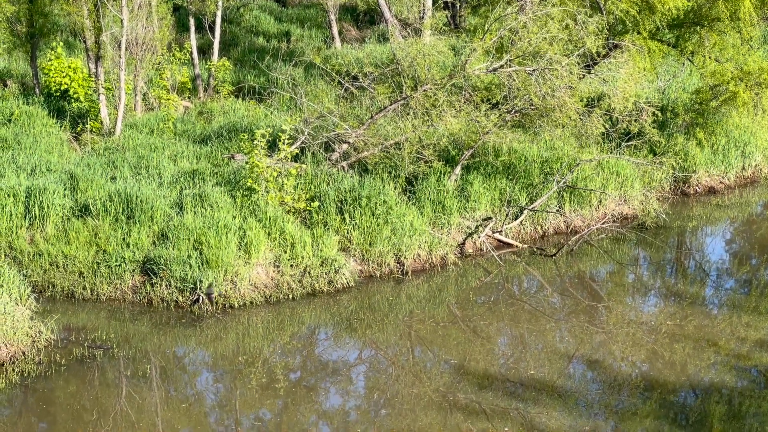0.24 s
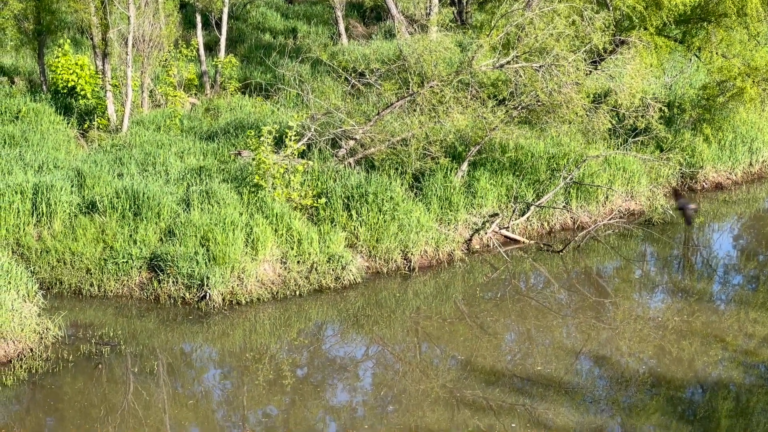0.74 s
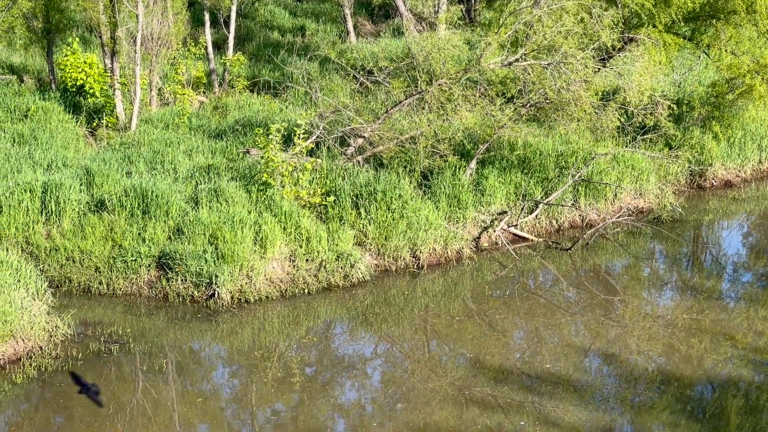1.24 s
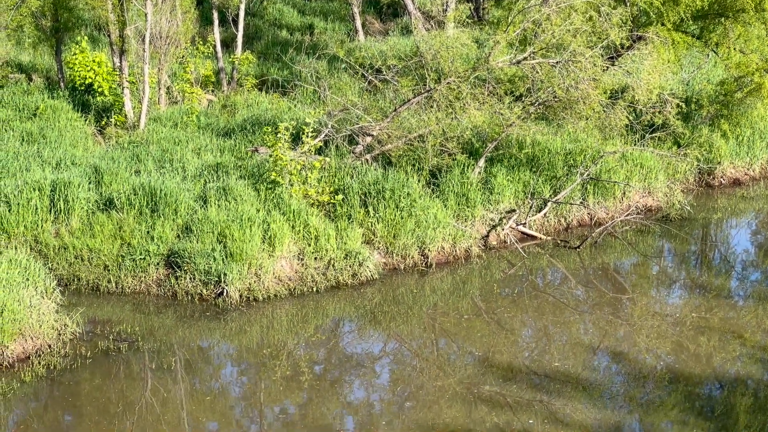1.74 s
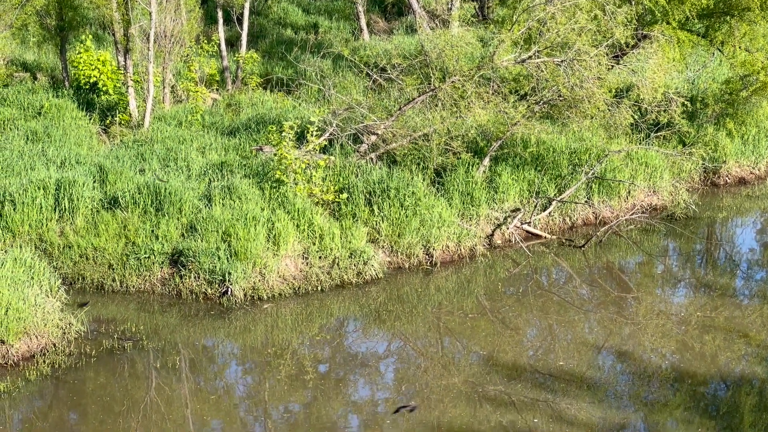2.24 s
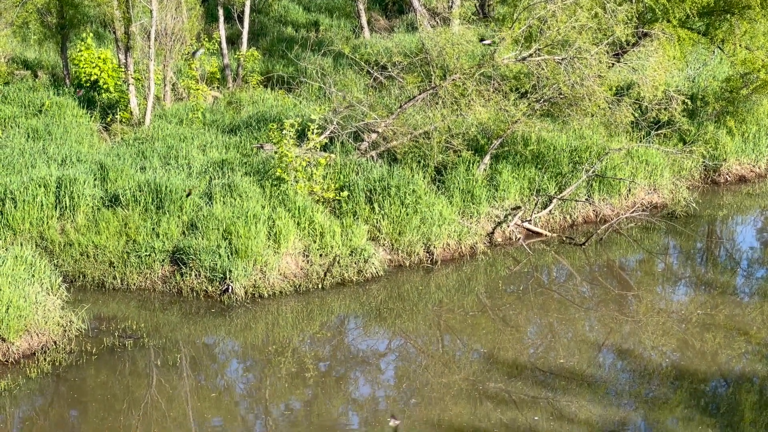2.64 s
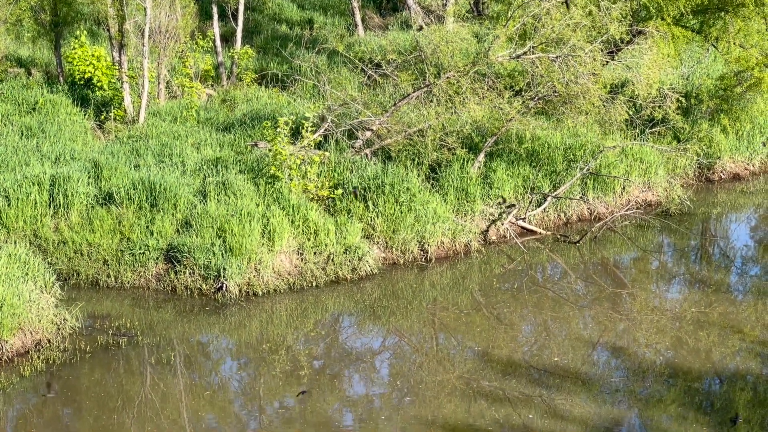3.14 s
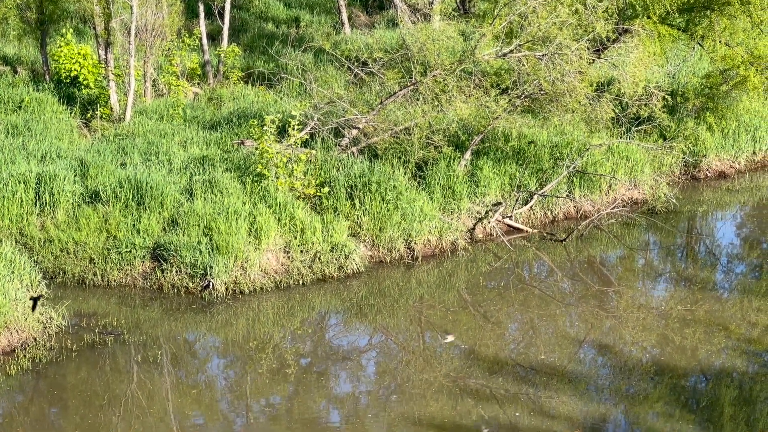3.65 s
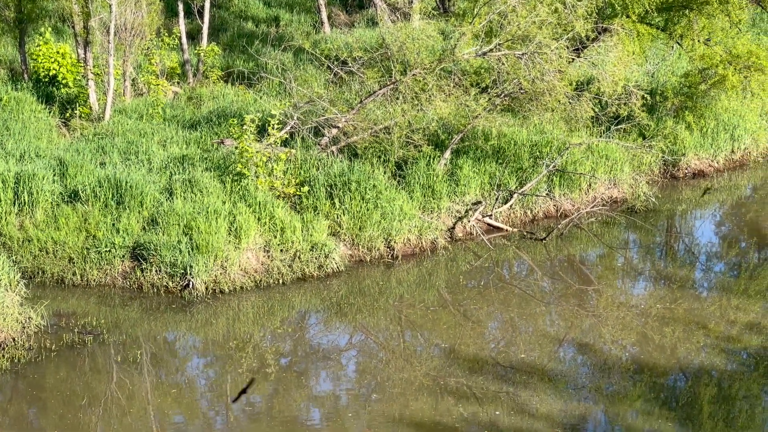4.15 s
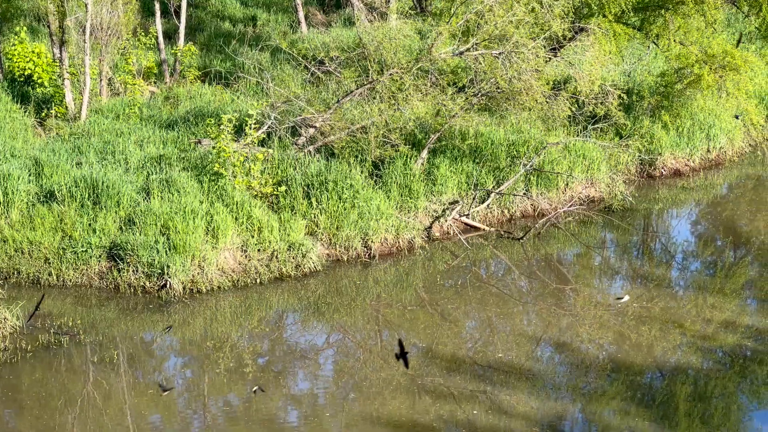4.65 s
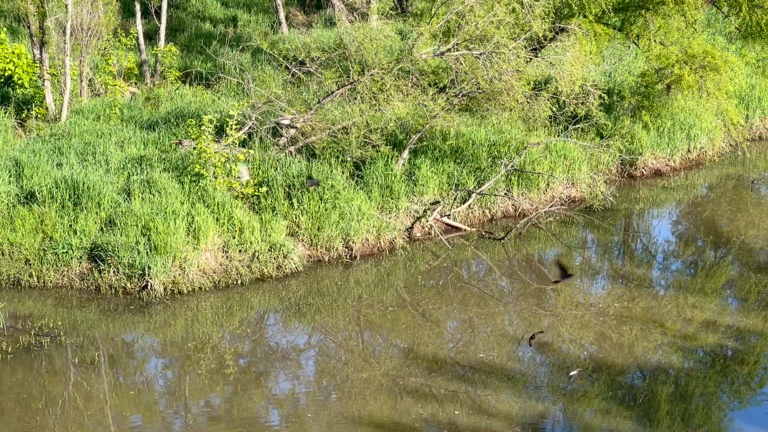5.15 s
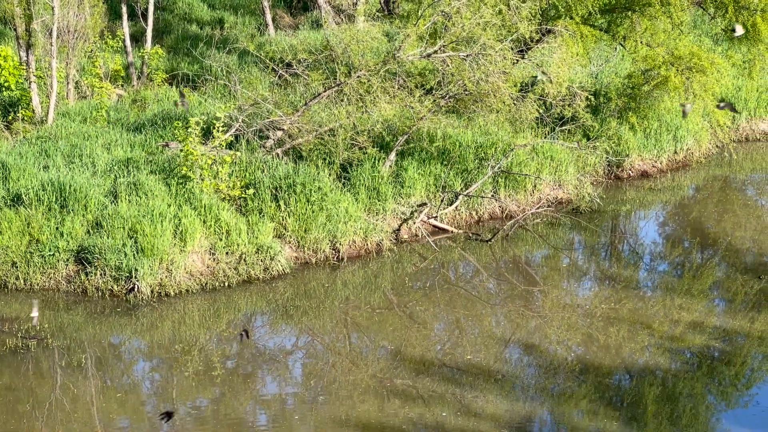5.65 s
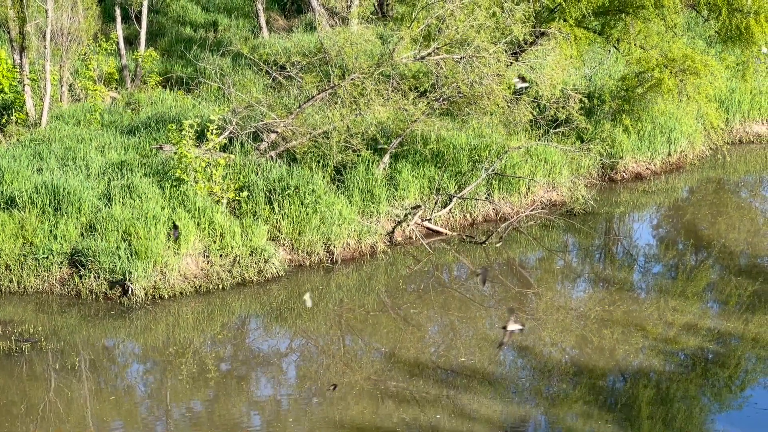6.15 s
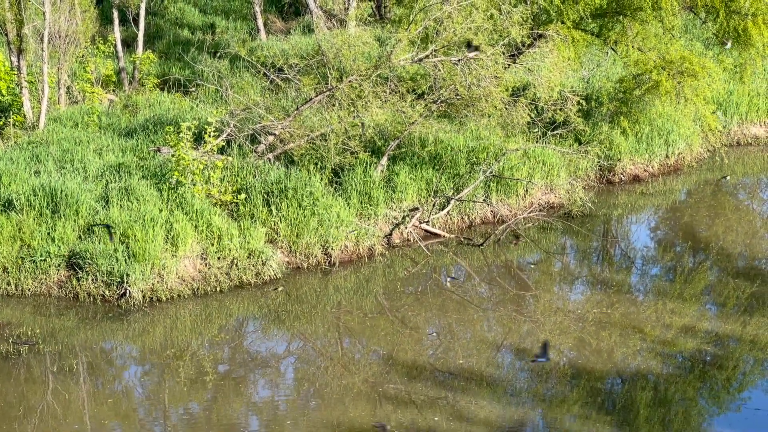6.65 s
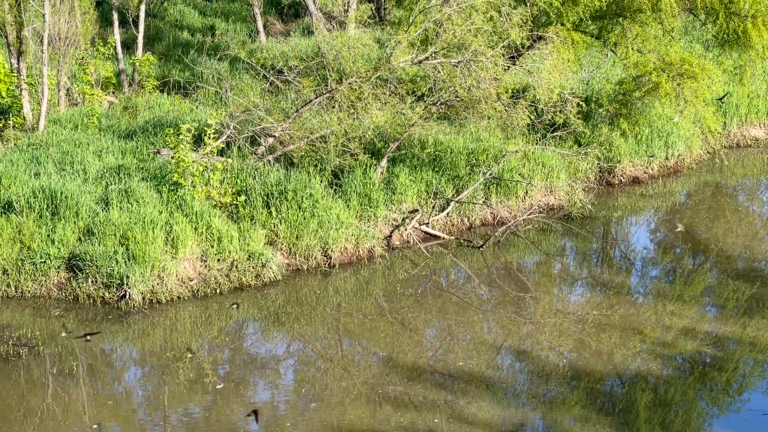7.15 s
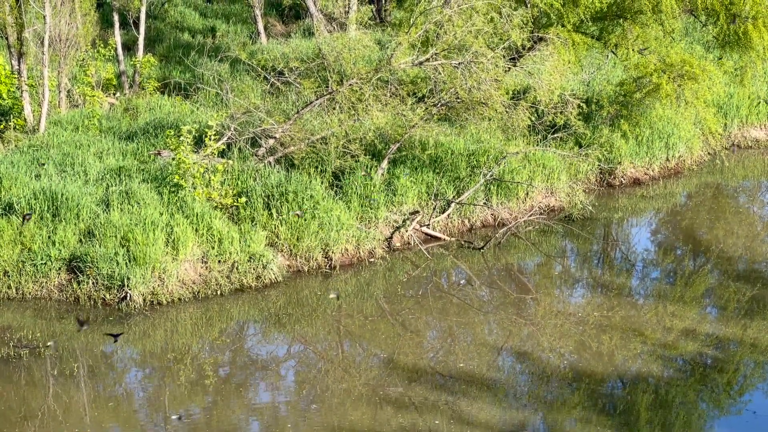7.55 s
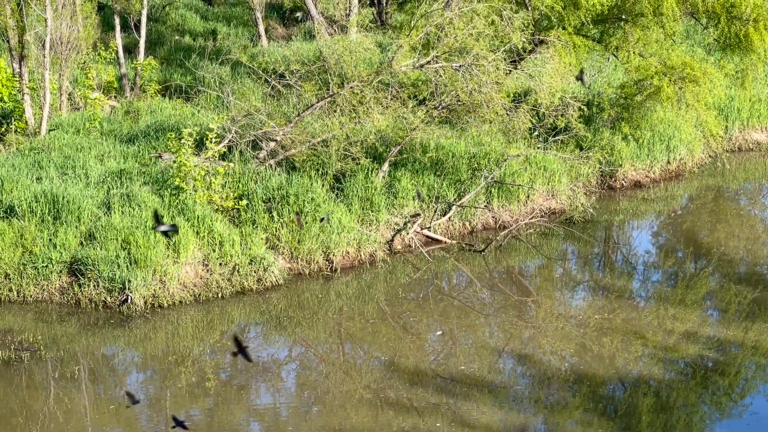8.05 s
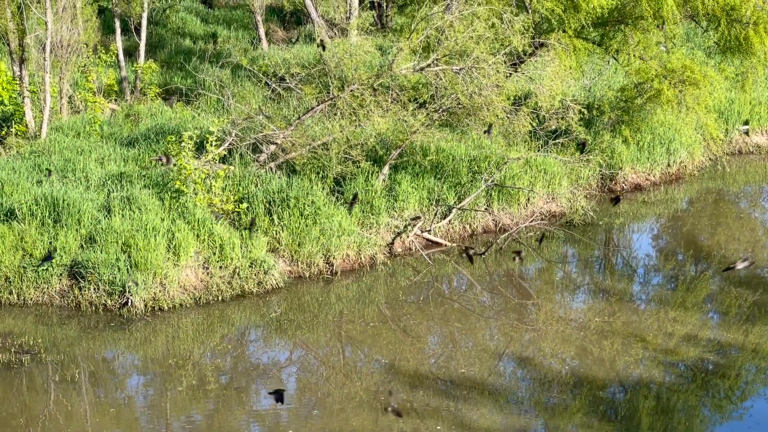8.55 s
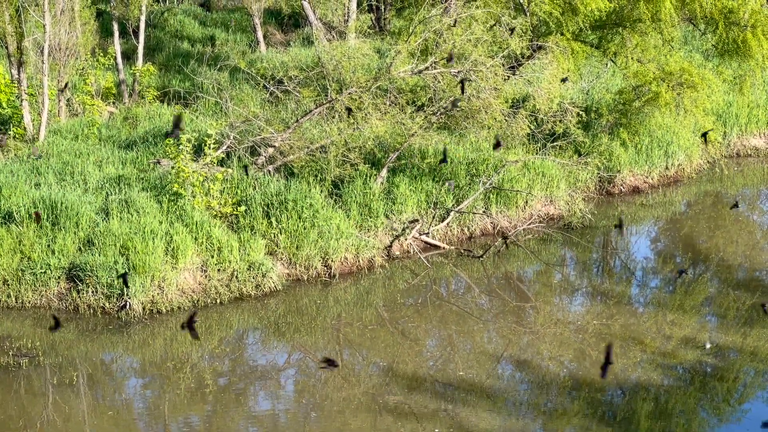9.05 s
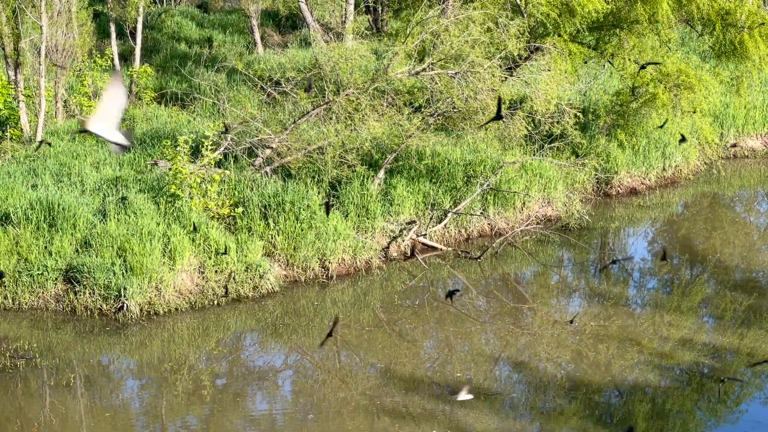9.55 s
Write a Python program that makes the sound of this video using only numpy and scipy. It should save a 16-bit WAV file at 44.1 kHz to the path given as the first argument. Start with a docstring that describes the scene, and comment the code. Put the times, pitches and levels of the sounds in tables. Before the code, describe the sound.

Quiet creekside birdsong: thin whistles and chips, a brisk high repeated phrase, then ever denser, louder falling swallow chirps over a growing low rush.

```python
"""Swallows over a creek

A flock of swallows calls over a creek, nearer and denser with time, while a warbler repeats its phrase in the trees.
Swallow calls are two gliding voices that modulate each other; the warbler, whistles and chips are single gliding sines.
Far chips twitter behind them and a wooden knock falls once; trunks and banks scatter the birds as decaying taps.
A low rush, shaped noise, grows near the end over the quiet air of the wood."""
import sys
import numpy as np
from scipy import signal
from scipy.fft import rfft, irfft, next_fast_len
from scipy.io import wavfile
from scipy.ndimage import uniform_filter1d

SR = 44100
rng = np.random.default_rng(int(sys.argv[2]) if len(sys.argv) > 2 else 0)


def to_wav(s):
    """Save 16-bit WAV."""
    ch = np.atleast_2d(s).T  # columns
    pcm = np.round(np.clip(ch, -1, 1) * 32767)  # PCM
    wavfile.write(sys.argv[1], SR, pcm.astype(np.int16))


N = 432180


def gain_of(db):
    """Decibels to amplitude gain."""
    return 10 ** (np.asarray(db) / 20)


def evened(x):
    """Scales to rms 1."""
    return x / np.sqrt(np.mean(x ** 2) + 1e-20)


def read(points, hz):
    """Reads a curve over frequency, interpolating on a log axis."""
    f, value = np.transpose(points)
    return np.interp(np.log(hz + 1), np.log(f + 1), value)


def waver(length, size):
    """Smooth random drift of rms 1; a larger size drifts more slowly."""
    once = uniform_filter1d(rng.standard_normal(length), size)
    return evened(uniform_filter1d(once, size))


def sine(hz):
    """Sine that follows a pitch track."""
    return np.sin(2 * np.pi * np.cumsum(hz) / SR)


def add(mix, s, sound, lag):
    """Mixes a sound in; the right channel hears it lag samples later."""
    for channel, at in enumerate((round(s * SR), round(s * SR + lag))):
        part = mix[channel, max(at, 0):][:len(sound)]
        part += sound[:len(part)]


def rasp(length, depth):
    """Turbulent air shakes the loudness quickly and spreads a noisy skirt round each line."""
    return 1 + depth * waver(length, size=36)


def flock():
    """Each call has its own lag between the channels; the water mirrors it after a short random delay."""
    # swallow calls: t/s, length/s, kind, upper voice start f/Hz, lower voice start f/Hz, sum tone end f/Hz,
    # call level/dB before its partials are weighted, upper voice added level/dB; the row at 5.947 s is the
    # water's duller mirror of the call at 5.95 s
    swallow_calls = [(3.104, 0.12, "wide", 2320, 1550, 2730, -57.5, -6.5),
                     (3.998, 0.18, "dull", 2377, 1732, 2466, -59, 0.5),
                     (4.513, 0.14, "close", 2250, 1970, 2510, -64.5, -6),
                     (4.697, 0.093, "shrill", 1934, 1725, 3000, -64.5, -12),
                     (5.064, 0.17, "long", 2250, 1976, 2560, -63.5, -7.5),
                     (5.267, .12, "close", 2270, 1977, 2990, -49.5, -5.5),
                     (5.489, 0.12, "shrill", 2064, 1350, 2415, -68, 5),
                     (5.634, .1, "wide", 2500, 1680, 2750, -58, 6.5),
                     (5.659, 0.16, "shrill", 2305, 1646, 2604, -65.5, -4),
                     (5.947, 0.13, "dull", 2690, 1837, 2850, -53.5, -12),
                     (5.95, 0.12, "high", 2708, 1860, 3370, -52, -6.5),
                     (6.059, 0.13, "close", 2162, 1950, 2690, -52, -9),
                     (6.209, 0.1, "low", 2073, 1550, 2830, -62.5, 2),
                     (6.273, 0.16, "long", 2320, 2156, 2654, -55, -9),
                     (6.523, 0.077, "dull", 1843, 1750, 2890, -57.5, -26),
                     (6.626, 0.13, "high", 2607, 1925, 3094, -49, -8),
                     (6.664, 0.084, "dull", 2606, 1708, 2790, -57.5, 0),
                     (6.889, 0.097, "wide", 2056, 1357, 2780, -66.5, 5.5),
                     (6.909, 0.15, "low", 2287, 1825, 2780, -55, -5.5),
                     (6.953, 0.13, "shrill", 2228, 1330, 2440, -65.5, 5.5),
                     (7.111, 0.096, "arched", 2430, 1566, 2770, -65, 14.5),
                     (7.157, 0.12, "high", 2636, 1935, 2960, -46, -5),
                     (8.348, 0.031, "shrill", 1990, 1495, 2840, -56, -24),
                     (7.243, 0.17, "dull", 2557, 1770, 3100, -58.5, -7.5),
                     (7.266, 0.16, "low", 1985, 1625, 2450, -63, -8),
                     (7.393, .13, "close", 2214, 1846, 2960, -54.5, -2),
                     (7.475, 0.072, "close", 2273, 2086, 3510, -52.5, -7),
                     (7.514, 0.11, "arched", 2203, 1646, 2450, -58, 2.5),
                     (7.604, .12, "high", 2606, 1932, 3180, -44.5, -7),
                     (7.668, 0.074, "wide", 2763, 1900, 2500, -56.5, -9),
                     (7.816, 0.084, "low", 2540, 1530, 2740, -70, 20),
                     (7.922, .13, "close", 2070, 1544, 2225, -52.5, -0.5),
                     (8.027, 0.17, "long", 2280, 2080, 2610, -55.5, 0.5),
                     (8.285, 0.097, "arched", 2415, 1482, 2464, -76.5, 30),
                     (8.4, 0.14, "high", 2640, 1993, 2680, -42.5, -5),
                     (8.577, 0.084, "high", 2347, 1662, 3170, -57.5, -3),
                     (8.601, 0.16, "long", 2210, 1915, 2410, -59, -0.5),
                     (8.683, 0.12, "dull", 2085, 1603, 2480, -60, 0),
                     (8.857, 0.091, "dull", 2500, 1520, 2670, -57.5, 9.5),
                     (8.919, 0.099, "wide", 2417, 1510, 2574, -51, 4),
                     (8.985, .13, "high", 2586, 2000, 2875, -40, -4.5),
                     (9.04, 0.13, "long", 2335, 1565, 2400, -55.5, -1),
                     (9.159, .13, "close", 2524, 1580, 2380, -71, 9),
                     (9.446, 0.098, "dull", 1977, 1794, 2640, -46, -9),
                     (9.486, .13, "high", 2552, 1850, 2954, -38.5, -5),
                     (9.635, 0.11, "close", 2223, 1490, 2720, -49, -11),
                     (9.701, 0.096, "low", 2507, 1547, 2800, -55.5, 6)]
    # kinds of call: bend [power of the fall], easing [0-1, as the fall levels off],
    # brightness level/dB, share of the fall taken by the upper voice [0-1]
    call_kinds = {"high": (1.74, 0.8, -5.5, 0.26), "close": (2.5, 0.46, -4.5, 0.31),
                  "arched": (2, 0.14, 20.2, 0.46), "dull": (1.44, 0, -5, 0.4), "wide": (1, 0.47, 12.7, .43),
                  "low": (1.5, .3, 6.9, 0.48), "shrill": (1.05, 0.476, 20.9, 0.43),
                  "long": (.9, 0.735, 11.4, 0.26)}
    out = np.zeros((2, N))
    for s, length, kind, upper_hz, lower_hz, end_hz, db, upper_db in swallow_calls:
        bend, ease, bright_db, share = call_kinds[kind]
        fall_hz = upper_hz + lower_hz - end_hz
        upper_end_hz = upper_hz - share * fall_hz
        lower_end_hz = lower_hz - (1 - share) * fall_hz
        sound = swallow(length, upper_hz, upper_end_hz, lower_hz, lower_end_hz,
                        bend, ease, db, upper_db, bright_db)
        lag = rng.normal(.7, .45)  # samples
        start_s = s - .012  # room for the scoop
        add(out, start_s, sound, lag)
        add(out, start_s + rng.uniform(.008, 0.022), gain_of(-11.0) * sound, lag)
    return out


def swallow(length, up0, up1, low0, low1, bend, ease, db, upper_db, bright_db):
    """Both halves of the syrinx fall together and modulate each other, so sums of their multiples sound."""
    # partials: multiple of upper voice, multiple of lower voice, level/dB
    partial_mix = [(1, 0, -5.5), (2, 0, 1), (3, 0, -25.5), (4, 0, -16), (5, 0, -13.5), (6, 0, -28),
                   (1, 1, 3.5), (2, 1, -11.5), (3, 1, -20), (2, 2, -13), (3, 2, -11), (3, 3, -18.5),
                   (4, 2, -28), (4, 1, -23.5), (5, 1, -16.5)]
    t = np.arange(round((length + 0.014) * SR)) / SR - .012
    scoop = 1 - .1 * np.clip(-t / 0.01196, 0, 1) ** 2  # pitch slides up as pressure builds
    fall = np.clip(t / length, 0, 1) ** bend
    fall = fall + np.clip(ease, 0, 1) * (np.sin(np.pi / 2 * fall) ** 2 - fall)

    # fainter birds are farther: air takes their high partials
    far_db = 0.67 * min(db + max(upper_db, 0) + 31.5, 0)
    flutter = 0.0024 * gain_of(-.8 * (far_db + 9.0))  # moving air blurs their pitch
    grain = 0.17 * gain_of(-.5 * (far_db + 9.5))  # and breaks the partials into beads, the high ones most

    def voice_phase(start_hz, end_hz):
        """Phase of one half of the syrinx along its fluttering fall."""
        hz = (start_hz + (end_hz - start_hz) * fall) * scoop
        return 2 * np.pi * np.cumsum(hz * (1 + flutter * waver(len(t), size=60))) / SR

    upper, lower = voice_phase(up0, up1), voice_phase(low0, low1)
    colour_db = 0.88 * rng.standard_normal(len(partial_mix))  # each call favours other partials
    tone = np.zeros(len(t))
    for (m, n, partial_db), own_db in zip(partial_mix, colour_db):
        level_db = partial_db + far_db * max(m + n - 3, 0)
        if m + n > 2:
            level_db += own_db + bright_db
        if n == 0:
            level_db += upper_db
        shimmer_db = 3.0 * (.25 if m == n else 1)  # equal multiples shimmer least
        level_db = level_db + shimmer_db * waver(len(t), size=220)
        beads = 1 + grain * (m + n) / 2 * waver(len(t), size=70)
        tone += gain_of(level_db) * np.sin(m * upper + n * lower) * beads

    hiss = np.diff(rng.standard_normal(len(t) + 1))  # air rushing through the beak, faint from afar
    tone = tone + gain_of(-26.0 + max(upper_db, 0) + 2.7 * far_db) * hiss
    swell = np.abs(np.sin(np.pi * np.linspace(0, 1, len(t)) ** 0.91)) ** 0.91
    return gain_of(db) * swell * tone * rasp(len(t), 0.082)


def warbler():
    """An arched and a rising whistle in turn, each a sine following its pitch and level curve."""
    # phrases: arched note t/s, rising note t/s, phrase level/dB
    phrases = [(2.389, 2.44, -58), (2.611, 2.662, -49), (2.8336, 2.886, -44.5), (3.062, 3.114, -44.5),
               (3.2953, 3.3482, -43.5), (3.524, 3.577, -44), (3.7555, 3.807, -45)]
    # arched note: t/s from onset, f/Hz, relative level/dB
    arched_note = [(-.008, 2855, -22), (.003, 4150, -9.5), (.011, 4530, -7), (.019, 4704, -4.5),
                   (.03, 4350, -6.5), (.043, 3700, -17.5), (.05, 3800, -24.5)]
    # rising note: t/s from onset, f/Hz, relative level/dB
    rising_note = [(-.005, 6050, -9), (.004, 4980, 0), (.012, 5114, 1), (.043, 5820, 1), (.058, 7490, 5.5),
                   (.068, 7990, 1.5), (.074, 8000, 1.5), (.083, 8570, -8), (.09, 8500, -45)]
    arch_boost_db = 5
    out = np.zeros((2, N))
    arch_s, rise_s, phrase_db = np.transpose(phrases)
    for shape, onsets, levels_db in ((arched_note, arch_s, phrase_db + arch_boost_db),
                                     (rising_note, rise_s, phrase_db)):
        s, hz, db = np.transpose(shape)
        t = np.arange(s[0], s[-1], 1 / SR)
        pitch = uniform_filter1d(np.interp(t, s, hz), 250, mode="nearest")
        for at, note_db in zip(onsets, levels_db):
            sung = pitch * (1 + 0.008 * waver(len(t), size=500))  # no two notes are quite alike
            level_db = np.interp(t, s, db) + 1.5 * waver(len(t), size=300)
            note = gain_of(level_db) * sine(sung) * signal.windows.tukey(len(t), .15)
            add(out, at + s[0], gain_of(note_db) * note, 1)
    return out


def whistles():
    """Near-pure gliding whistles and chips, on a curved glide; the low ones throb."""
    # whistles and chips: t/s, length/s, start f/Hz, middle f/Hz, end f/Hz, level/dB
    whistle_notes = [(0.019, 0.054, 2690, 2700, 2860, -63.5), (0.066, 0.092, 2820, 3133, 2920, -59),
                     (0.272, 0.046, 5720, 5150, 4930, -64), (0.292, 0.085, 2770, 2690, 2637, -57.5),
                     (0.369, 0.078, 2980, 2868, 2820, -54), (0.362, 0.029, 3400, 3180, 2940, -67),
                     (0.395, 0.03, 6100, 5800, 5450, -63), (0.6, 0.105, 4160, 3590, 2820, -56),
                     (0.605, 0.028, 3030, 2990, 2890, -60), (0.844, 0.059, 4650, 3840, 3370, -62.5),
                     (0.866, 0.05, 2640, 2574, 2530, -51), (0.918, 0.067, 2580, 2645, 2690, -53),
                     (0.983, 0.058, 2700, 2700, 2750, -62), (0.882, 0.057, 5460, 5200, 4280, -69),
                     (0.915, 0.05, 5650, 5400, 5440, -74), (1.45, 0.033, 4410, 4450, 4500, -70),
                     (1.319, 0.052, 2130, 2200, 2370, -73.5), (1.76, 0.015, 3800, 3450, 3270, -61),
                     (1.828, 0.044, 7200, 5850, 4720, -69), (1.838, 0.07, 4980, 4510, 4620, -60),
                     (1.51, 0.048, 6500, 6160, 6040, -75), (1.655, 0.04, 7700, 6640, 5630, -74),
                     (1.969, 0.066, 4080, 4920, 6440, -62), (2.025, 0.044, 5920, 5340, 3100, -65),
                     (2.123, 0.088, 3450, 3516, 3620, -61), (2.235, 0.059, 5050, 5930, 8170, -63.5),
                     (2.33, 0.061, 2615, 2600, 2550, -71.5), (2.469, 0.0088, 3700, 3410, 3400, -59),
                     (2.643, 0.16, 2790, 2265, 2385, -73.5), (2.763, 0.0079, 3340, 3510, 3640, -56),
                     (2.923, 0.18, 3640, 2324, 2300, -71), (3.421, 0.083, 2335, 2730, 3130, -73),
                     (3.002, 0.009, 3540, 3380, 3480, -58), (3.57, 0.027, 2330, 2430, 2590, -58),
                     (3.583, 0.079, 2980, 3140, 2870, -59), (3.483, 0.05, 3350, 4150, 5050, -63),
                     (3.688, 0.0068, 3500, 3530, 3400, -62), (3.748, 0.088, 2950, 2846, 2860, -62),
                     (3.702, 0.095, 4900, 3820, 3130, -59.5), (3.893, 0.048, 3300, 4450, 3800, -59.5),
                     (3.955, 0.086, 7220, 6160, 6020, -70), (3.965, 0.052, 3190, 4480, 4700, -58.5),
                     (4.057, 0.11, 5780, 4690, 3290, -59), (4.106, 0.049, 5200, 5400, 7970, -68.5),
                     (4.206, 0.068, 2270, 2216, 2440, -66), (4.259, 0.091, 4930, 5220, 7570, -75),
                     (4.296, 0.037, 3200, 3900, 4740, -60.5), (4.361, 0.036, 3340, 4300, 4600, -64),
                     (4.403, 0.16, 2194, 2243, 1930, -68.5), (4.479, 0.11, 4920, 6320, 6400, -74),
                     (4.595, 0.045, 5500, 5120, 4600, -61), (4.71, 0.08, 7540, 6700, 4880, -67.5),
                     (4.795, 0.069, 3250, 3300, 3370, -71.5), (4.943, 0.012, 3200, 3440, 3580, -63.5),
                     (6.163, 0.032, 6900, 5800, 4750, -57), (6.353, 0.1, 6250, 5250, 4540, -61.5),
                     (6.479, 0.046, 3530, 4380, 4280, -59.5), (7.337, 0.02, 7500, 7140, 6130, -58),
                     (7.477, 0.046, 9030, 6500, 4200, -57), (7.875, 0.046, 5160, 5820, 5800, -55.5),
                     (8.161, 0.048, 6700, 6320, 5500, -61.5), (7.3, 0.031, 4700, 5120, 6260, -58),
                     (9.197, 0.21, 2560, 2330, 2175, -71.5), (9.364, 0.066, 3920, 4600, 4800, -62),
                     (9.385, 0.028, 2650, 3200, 3200, -56.5)]
    throb_hz, throb_depth, throb_below_hz = 79.7, 0.35, 3200
    out = np.zeros((2, N))
    for s, length, start_hz, middle_hz, end_hz, db in whistle_notes:
        u = np.linspace(0, 1, round(length * SR))
        # parabola through the three pitches
        hz = start_hz * (1 - u) * (1 - 2 * u) + 4 * middle_hz * u * (1 - u) + end_hz * u * (2 * u - 1)
        tone = sine(hz * (1 + 0.012 * waver(len(u), size=60)))
        if middle_hz < throb_below_hz:
            tone *= 1 + throb_depth * np.cos(2 * np.pi * throb_hz * u * length)
        level = gain_of(db + 3.7 * waver(len(u), size=400))
        note = level * tone * rasp(len(u), 0.082) * signal.windows.tukey(len(u), .45)
        add(out, s, note, rng.choice([0.036, 1, 0.83, 1.6]))
    return out


def twitter():
    """Many far birds at random, short rough chips that mostly fall, louder as the flock nears."""
    out = np.zeros((2, N))
    for at, pitch, glide, size, loud in rng.random((700, 5)):
        u = np.linspace(0, 1, round((0.023 + 0.05 * size) * SR))
        hz = (2500 + 4200 * pitch) * (1 + .5 * (glide - .7) * u)
        level = gain_of(-91 + 8.2 * loud + 3.7 * at ** 2)
        chip = level * np.sin(np.pi * u) * rasp(len(u), 0.66) * sine(hz)
        add(out, at * N / SR, chip, 1)
    return out


def knock():
    """One short wooden knock, a sine with a fast decay."""
    # knock: t/s, level/dB, f/Hz
    wood = [(1.772, -47, 720)]
    out, t = np.zeros((2, N)), np.arange(2000) / SR
    for s, db, hz in wood:
        decay = gain_of(db - 60 * t / 0.03)  # falls 60 dB in 0.03 s
        attack = np.minimum(t / 0.0024, 1)
        add(out, s, decay * np.sin(2 * np.pi * hz * t) * attack, 8)
    return out


def echoes(x, t60):
    """Trunks and banks scatter the sound: sparse clumped taps of random sign, down 60 dB after t60 seconds."""
    same = 0.95  # likeness of the two channels
    grid = np.arange(260, SR // 2, 20)
    at = grid + rng.integers(0, 20, (2, len(grid)))
    level_db = -60 * at / SR / t60 + 2.5 * waver(len(grid), size=20)
    taps = np.zeros((2, SR // 2 + 20))
    np.put_along_axis(taps, at, rng.choice([-1., 1.], at.shape) * gain_of(level_db), 1)
    taps[1] = same * taps[0] + np.sqrt(1 - same ** 2) * taps[1]
    return signal.oaconvolve(x, taps / np.linalg.norm(taps[0]), axes=1)[:, :N]


def noise(shape, level_db, patchy_db, lumpy_db):
    """Stereo noise with drifting patches and short lumps shared by all bands."""
    # left ahead of right: f/Hz, phase [rad]
    left_lead = [(40, .1), (250, 0.68), (1030, 1.75), (1640, 1.1), (15000, 0.24)]
    # left-right likeness: f/Hz, likeness [0-1]
    likeness = [(300, 0.96), (1000, 1), (15000, 0.23)]
    # left over right: f/Hz, level/dB
    left_tilt = [(80, -2), (700, 2), (1290, 3.5), (2380, -2)]
    frames, hz = N // 256 + 5, np.fft.rfftfreq(1024, 1 / SR)
    a, b, c, d, patches = rng.standard_normal((frames, 513, 5)).T
    patches = evened(uniform_filter1d(uniform_filter1d(patches, 5, 0), 14, 1))
    same = np.clip(read(likeness, hz), 0, 1)[:, None]
    left = a + 1j * b
    right = same * left + np.sqrt(1 - same ** 2) * (c + 1j * d)
    right = right * np.exp(-1j * read(left_lead, hz))[:, None]
    tilt = gain_of(read(left_tilt, hz) / 2)[:, None]
    band_db = read(shape, hz)[:, None] + patchy_db * patches + lumpy_db * waver(frames, size=6)
    spectrum = np.array([left * tilt, right / tilt]) * gain_of(band_db)
    out = signal.istft(spectrum, nperseg=1024, noverlap=768)[1][:, :N]
    return gain_of(level_db) * out / np.sqrt(np.mean(out.mean(0) ** 2))  # level of the two channels' mean


def low_rush():
    """A rumble and the rush above it, two shaped noises whose levels move on their own."""
    # levels over time: t/s, rumble level/dB, rush level/dB
    rush_levels = [(0, -71.5, -77), (1, -74.5, -77), (1.9, -80.5, -81), (3.4, -76, -76), (4.9, -82, -79),
                   (6.7, -70, -72), (8.1, -76, -62.5), (9.099, -77, -59.5), (9.8, -67.5, -52.5)]
    # rumble spectrum: f/Hz, relative level/dB
    rumble_shape = [(15, -58), (25, -31), (38, -35), (67, -7), (162, 8), (400, -12.5), (520, -39),
                    (880, -120)]
    # rush spectrum: f/Hz, relative level/dB
    rush_shape = [(71, -41.5), (120, -9), (284, 0), (447, -4.5), (542, -5), (843, -2), (1280, -22),
                  (1800, -31), (2340, -56), (3960, -120)]
    s, *levels_db = np.transpose(rush_levels)
    rumble_db, rush_db = (np.interp(np.arange(N) / SR, s, db) for db in levels_db)
    rumble = noise(rumble_shape, rumble_db, patchy_db=4.0, lumpy_db=2.3)
    return rumble + noise(rush_shape, rush_db, patchy_db=3.3, lumpy_db=2.0)


def quiet_air():
    """The quiet of the wood, faint steady noise."""
    # air spectrum: f/Hz, relative level/dB
    air_shape = [(710, -32), (1200, 14), (3850, -4.5), (4830, -9), (6110, -26), (7170, -29), (15500, -27.5)]
    return noise(air_shape, -91.5, patchy_db=1.5, lumpy_db=.5)


def scene():
    """Birds with their echoes over the rush, the quiet air and the knock."""
    calls, song, notes = flock(), warbler(), whistles()
    birds = calls + song + notes
    # the far twitter reaches the microphone only as echoes
    scattered = echoes(gain_of(-11.5) * calls, 0.21) + echoes(gain_of(-4) * song, 0.29)
    scattered += echoes(gain_of(-3) * notes + twitter(), .32)
    return birds + scattered + knock() + low_rush() + quiet_air()


def record(dry):
    """Microphone colour with a notch near 10 kHz, then the band limit."""
    # microphone response: f/Hz, level/dB
    mic_response = [(6500, 1.45), (9000, -8), (10100, -35), (11200, 3.5), (15500, 10)]
    edge_hz = 15680
    size = next_fast_len(N + SR)
    gain = gain_of(read(mic_response, np.fft.rfftfreq(size, 1 / SR)))
    coloured = irfft(rfft(dry, size, axis=1) * gain, size, axis=1)[:, :N]
    lowpass = signal.firwin(511, edge_hz, window=("kaiser", 9), fs=SR)
    return signal.oaconvolve(coloured, lowpass[None], "same")


dry = scene()
out = record(dry)
to_wav(out)
```